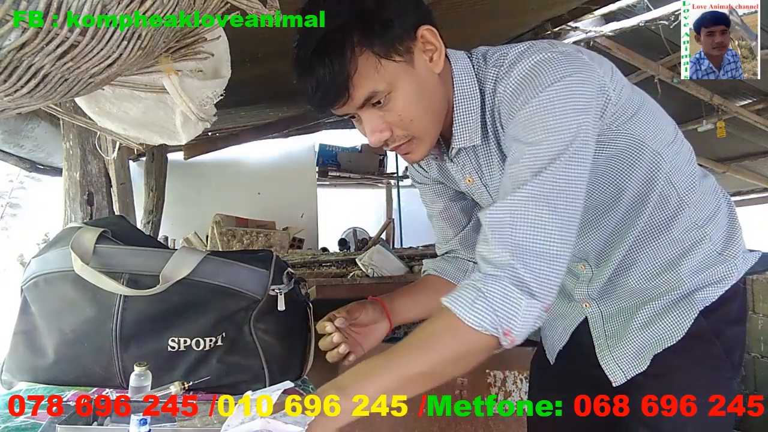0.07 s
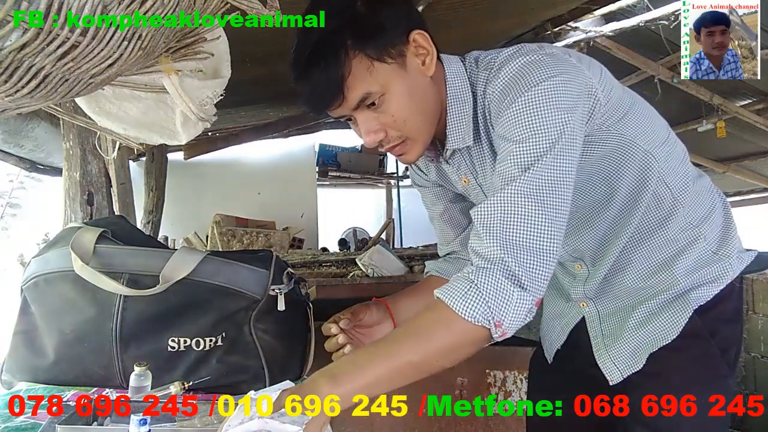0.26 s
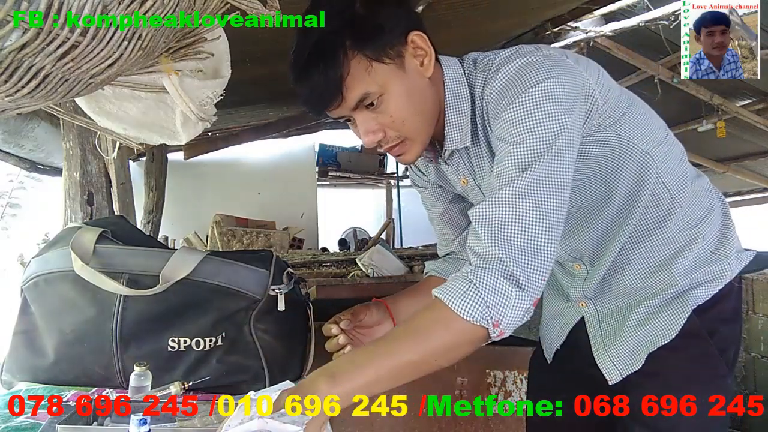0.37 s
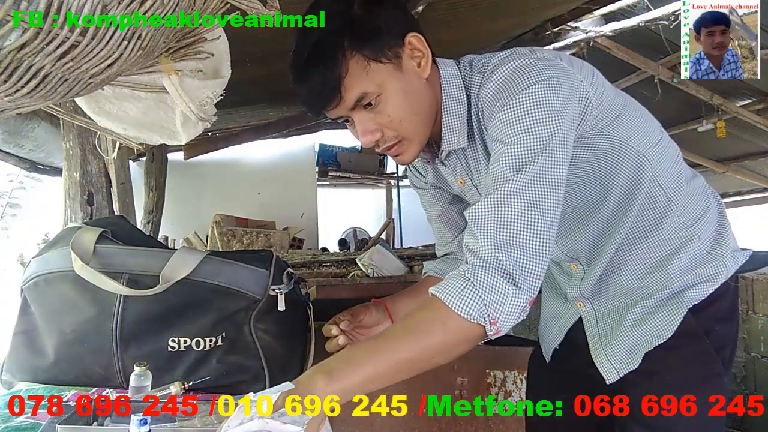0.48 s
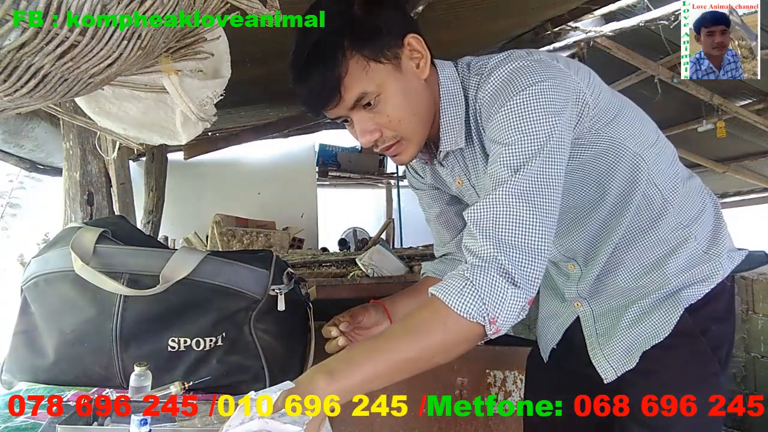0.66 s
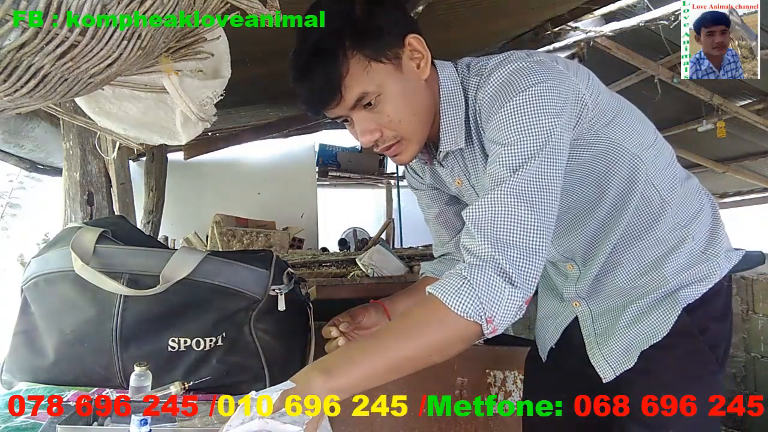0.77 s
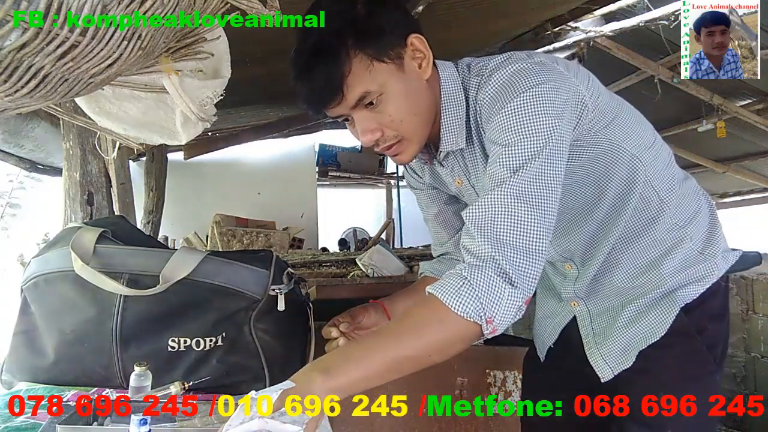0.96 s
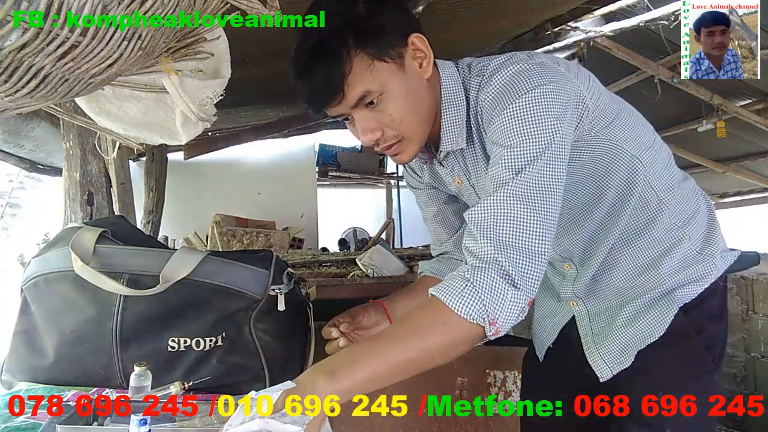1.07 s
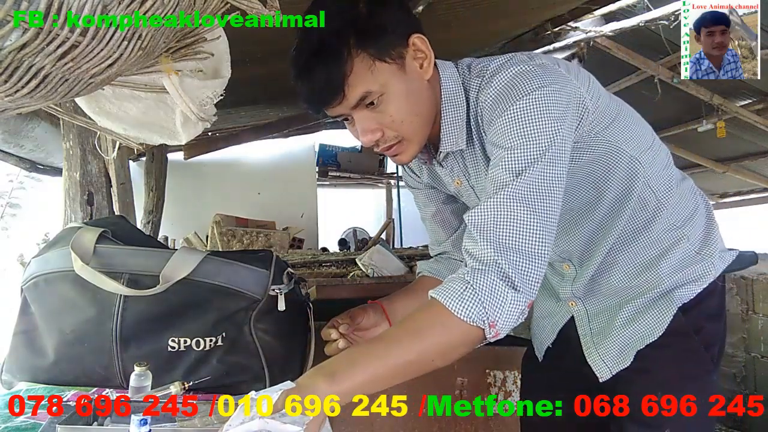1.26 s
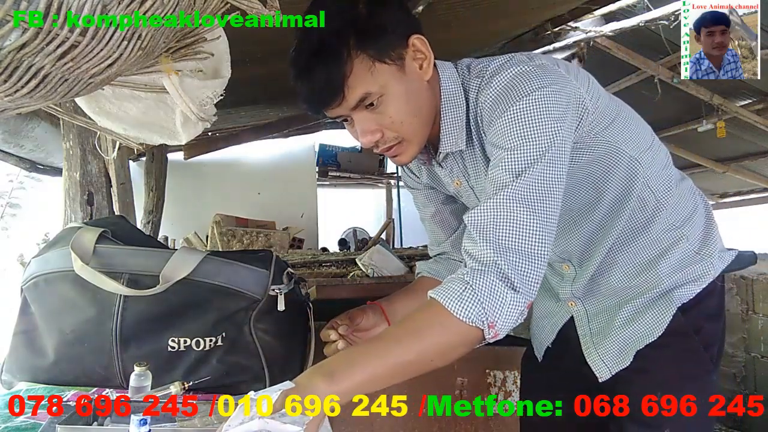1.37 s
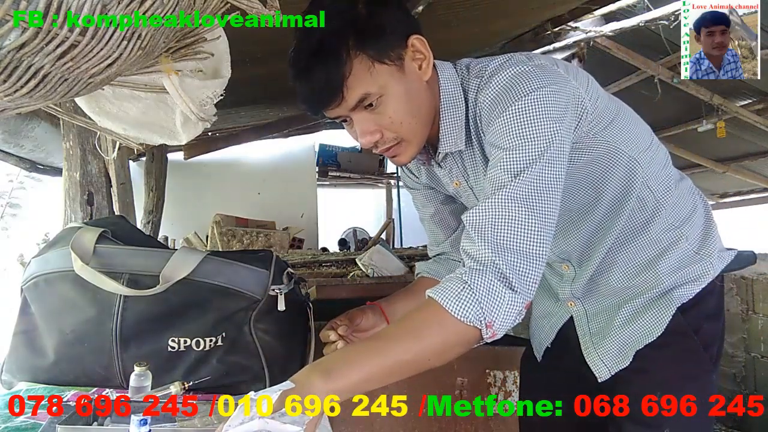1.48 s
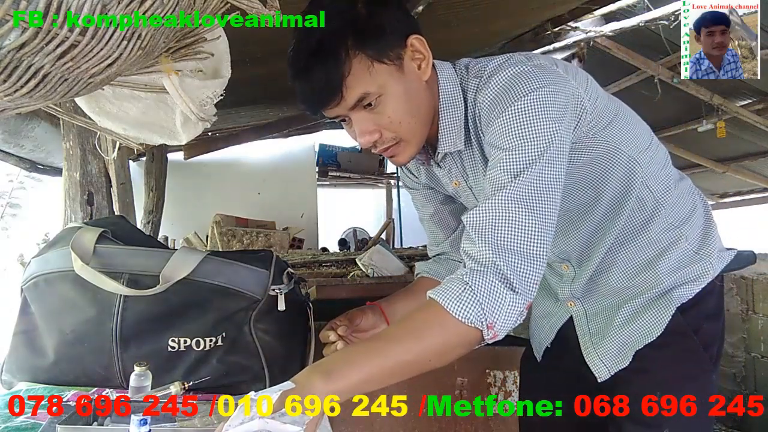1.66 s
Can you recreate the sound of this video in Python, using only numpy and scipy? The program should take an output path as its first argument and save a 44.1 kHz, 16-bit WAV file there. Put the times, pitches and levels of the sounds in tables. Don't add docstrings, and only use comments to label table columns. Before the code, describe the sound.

A pig grunts close by from 0.1 to 0.4 seconds, in separate throaty pulses peaking near 0.25, with a short wall slap. From 0.43 to 1.55 a pig further back gives seven hoarse cries, mostly arching in pitch; the first is highest and loudest, later ones softer, with one last high cry at 1.35. Thin plastic crackles at the microphone, strongest from 0.5 to 0.9. Birds chirp and trill; a distant engine throbs faintly.

```python
import sys
import numpy as np
from scipy import signal
from scipy.fft import rfft, irfft
from scipy.io import wavfile
from scipy.ndimage import uniform_filter1d

SR = 44100
rng = np.random.default_rng(int(sys.argv[2]) if len(sys.argv) > 2 else 0)


def wav_out(sig):
    wavfile.write(sys.argv[1], SR, np.round(np.clip(np.atleast_2d(sig).T, -1, 1) * 32767).astype(np.int16))


def rack_gain(trim_db):
    fader = np.asarray(trim_db, float)
    return 10 ** (fader / 20)


N = 77175


def evened(x):
    return x / np.sqrt(np.mean(x ** 2) + 1e-20)


def read(points, hz):
    f, value = np.transpose(points)
    return np.interp(np.log(hz + 1), np.log(f + 1), value)


def add(mix, s, sound):
    part = mix[max(round(s * SR), 0):][:len(sound)]
    part += sound[:len(part)]


def resonate(x, hz, width):
    turn = np.exp(2j * np.pi * np.cumsum(hz * np.ones(len(x))) / SR)
    r = np.exp(-np.pi * width / SR)
    return 2 * (turn * signal.lfilter([1 - r], [1, -r], x / turn + 1e-18)).real


def drift(n, smooth_s):
    size = max(round(smooth_s * SR), 1)
    smooth = uniform_filter1d(rng.standard_normal(n), size)
    return evened(uniform_filter1d(smooth, size))


def colour(x, points):
    return irfft(rfft(x) * rack_gain(read(points, np.fft.rfftfreq(N, 1 / SR))), N)


def placed(x, side, pan_db):
    port_gap_s = 0.00037
    turn = np.exp(1j * np.pi * np.fft.rfftfreq(N, 1 / SR) * port_gap_s * side)
    ports = np.array([turn * rack_gain(pan_db / 2), rack_gain(-pan_db / 2) / turn])
    return irfft(rfft(x) * ports, N)


def shed(x, first_s):
    # hz, t60_s
    decay = [(150, 0.59), (600, 0.42), (2000, 0.48), (6000, 0.33), (12000, 0.041)]
    taps = np.zeros((2, SR // 2))
    at = np.arange(round(first_s * SR), SR // 2 - 20, 20)
    at = at + rng.integers(0, 20, (2, len(at)))
    np.put_along_axis(taps, at, rng.choice([-1., 1.], at.shape), 1)
    hz, t, z = signal.stft(taps, SR, nperseg=256)
    same = 1 / (1 + (hz[:, None] / 500) ** 2)
    z = np.array([z[0], same * z[0] + np.sqrt(1 - same ** 2) * z[1]])
    fade = rack_gain(-60 * t / read(decay, hz)[:, None])
    tail = signal.istft(z * fade, SR, nperseg=256)[1]
    return signal.fftconvolve(x[None], tail / np.linalg.norm(tail[0]), axes=1)[:, :N]


def farm_gain(column):
    # start_s, noise_db, engine_db
    swell = [
        (0, -4, 2.6),
        (.05, -6.5, 3),
        (.14, -0.5, 4),
        (.2, 5.2, -4.9),
        (1.1, -0.2, 0.3),
        (1.3, 4, -4),
        (1.75, 5, -4),
    ]
    rows = np.transpose(swell)
    return rack_gain(np.interp(np.arange(N) / SR, rows[0], rows[column]))


def engine():
    # multiple, level_db
    orders = [(3, -92), (4, -63), (5, -55.5), (6, -63), (7, -72.5), (8, -83), (10, -69)]
    firing_hz = 18.3
    turns = np.cumsum(firing_hz * (1 + 0.0168 * drift(N, 0.14))) / SR
    out = np.zeros(N)
    for k, db in orders:
        level = 1.21 * rack_gain(db + 2. * drift(N, 0.18))
        out += level * np.cos(2 * np.pi * k * turns + 0.33 * drift(N, 0.034))
    return out


def air():
    # hz, level_db_per_hz
    spectrum = [(15, -64), (25, -19.5), (98, -12.5), (326, -16.5), (1060, -21), (1900, -47), (4240, -34),
                (12000, -77), (14900, -82)]
    left, right = rng.standard_normal((2, N))
    low = signal.lfilter([.04], [1, -.96], left - right)
    ports = np.array([left, right + 1.04 * low])
    return rack_gain(-57 + 0.28 * drift(N, 0.096)) * evened(colour(ports, spectrum))


def rustle():
    # start_s, level_db
    pressure = [(0.0, -73), (0.15, -75.5), (0.19, -62.5), (0.272, -57.5), (0.398, -69.5), (0.476, -48),
                (0.618, -55.5), (0.74, -48), (0.906, -50), (0.994, -60.5), (1.212, -65.5), (1.31, -72),
                (1.364, -60.5), (1.612, -74), (1.646, -64.5), (1.75, -75.5)]
    # hz, level_db_per_hz
    crinkle = [(1900, -8), (3000, -0.5), (3300, 1), (4340, -6), (6440, 1.5), (7570, -11), (8250, -8.5),
               (13200, -20), (14900, -42)]
    t = np.arange(N) / SR
    sizes = rack_gain(np.minimum(rng.exponential(1, (2, N)), 4))
    grains = sizes * (rng.random((2, N)) < .2) * rng.standard_normal((2, N))
    near = evened(colour(grains[0] * rack_gain(2. * drift(N, 0.0035)), crinkle))
    wide = evened(colour(grains * rack_gain(2. * drift(N, 0.032)), crinkle))
    level = rack_gain(4.5 + np.interp(t, *np.transpose(pressure)))
    return level * (0.1 * placed(near, 0.98, 0.87) + 0.76 * wide)


def patchy(x):
    patch_db = 4
    hz, t, z = signal.stft(x, SR, nperseg=512)
    field = uniform_filter1d(rng.standard_normal(z.shape[1:]), size=6, axis=0)
    field = evened(uniform_filter1d(field, size=9, axis=1))
    depth = 0.4178 + hz[:, None] / 12000
    return signal.istft(z * rack_gain(patch_db * field * depth), SR, nperseg=512)[1][:, :N]


def trilling():
    # start_s, length_s, pitch_hz, width_hz, level_db
    trills = [(0, .19, 3150, 240, -68), (.043, .065, 4100, 900, -56), (0, .06, 5900, 600, -68),
              (1.645, .1, 5200, 800, -66), (.045, .06, 8000, 900, -73), (.04, .13, 800, 40, -65),
              (.09, .09, 600, 50, -63), (.165, .03, 5300, 900, -62), (1.34, .075, 8350, 500, -51),
              (1.33, .15, 6250, 500, -60), (1.335, .15, 12200, 900, -70), (1.644, .012, 9500, 5000, -67),
              (1.33, .17, 450, 110, -48), (1.1, .11, 430, 90, -50), (1.1, .1, 1065, 50, -48),
              (1.34, .3, 4450, 400, -66), (1.55, .2, 600, 70, -61), (1.6, .15, 1050, 90, -66),
              (1.05, .07, 8300, 300, -67), (.92, .65, 340, 130, -57)]
    beats_per_s = 110
    out = np.zeros(N)
    for s, length, hz, width, db in trills:
        t = np.arange(0, length, 1 / SR)
        beat = 0.58 + np.sin(np.pi * beats_per_s * t) ** 2
        buzz = resonate(resonate(beat * rng.standard_normal(len(t)), hz, width), hz, width)
        envelope = np.minimum(t / 0.0073, 1) * rack_gain(-7 * t / length)
        add(out, s, rack_gain(db) * envelope * evened(buzz))
    return out


def grunt():
    # start_s, level_db, brightness_db_per_octave, thump_db
    pulses = [
        (.104, -57, -8, -58),
        (.15, -45, -7, -50),
        (.185, -30, .5, -46),
        (.223, -19.5, 0, -42),
        (.26, -18.5, 0, -42),
        (.295, -23.5, -1, -42),
        (.332, -35, -9, -39),
        (.369, -42, -10, -44),
    ]
    # pitch_hz, width_hz, level_db
    throat = [(330, 200, -4), (590, 260, 0), (1087, 300, 1), (1500, 500, -3), (1960, 600, 4),
              (2550, 600, 0), (3200, 600, 1.5), (4100, 1350, 0), (6500, 2500, -17)]
    # pitch_hz, width_hz, level_db
    chest = [(97.6, 26, 3.5), (143.3, 48.4, 3.5), (190, 51, -1.5), (300, 400, -6.5)]
    snap_s, puff_s, puff_db = 0.00083, .0045, -7
    slap_s, slap_db = .0075, -8
    out, t = np.zeros(N), np.arange(4000) / SR
    click = 1. * (t == 0)
    for s, db, bright_db, thump_db in pulses:
        noise = rng.standard_normal(len(t))
        snap = (t / snap_s) ** 2 * np.exp(-t / snap_s) * noise
        snap[round(2 * snap_s * SR)] -= 7.
        puff = (t / puff_s) * np.exp(-t / puff_s) * noise[::-1]
        drive = snap + rack_gain(puff_db) * puff
        pulse, thump = np.zeros(len(t)), np.zeros(len(t))
        for f, w, g in throat:
            ring = resonate(resonate(drive, f, 0.88 * w), f, 0.81 * w)
            pulse += rack_gain(g + bright_db * np.log2(f / 600)) * ring / np.sqrt(w)
        for f, w, g in chest:
            thump += rack_gain(g) * resonate(resonate(click, f, 1.5 * w), f, 1.26 * w) / w
        pulse = signal.lfilter(*signal.butter(1, 8000., fs=SR), pulse)
        pulse = rack_gain(db) * pulse / abs(pulse).max() + 2 * rack_gain(thump_db) * thump / abs(thump).max()
        add(out, s - .001, pulse)
        add(out, s - .001 + slap_s, rack_gain(slap_db) * pulse)
    return out


def chirping():
    # start_s, length_s, from_hz, to_hz, level_db
    chirps = [(0.18, 0.024, 3540, 5010, -49), (.2, 0.011, 5500, 5900, -47),
              (0.215, 0.023, 4040, 3480, -47.5), (0.266, 0.026, 3730, 4200, -47),
              (0.616, 0.024, 3750, 5900, -46.5), (0.69, 0.032, 3590, 4500, -49.5),
              (0.737, 0.012, 5010, 5400, -45.5), (0.743, 0.0069, 6590, 6230, -43.5),
              (0.815, 0.027, 5300, 6300, -41.5), (0.861, 0.019, 5840, 6150, -53),
              (0.89, 0.033, 4440, 6070, -42.5), (1.001, 0.037, 3600, 2490, -61.5),
              (1.175, 0.0224, 4135, 4694, -48), (1.186, 0.042, 4644, 2997, -52.5),
              (1.234, 0.042, 3943, 2250, -51.5), (1.642, 0.012, 3930, 5684, -46.5),
              (1.652, 0.012, 5490, 5600, -54.5), (1.667, .012, 5600, 3820, -63),
              (1.67, 0.0104, 3860, 3110, -52), (1.717, 0.023, 3060, 4620, -51)]
    out = np.zeros(N)
    for s, length, from_hz, to_hz, db in chirps:
        u = np.arange(0, length, 1 / SR) / length
        hz = from_hz + (to_hz - from_hz) * u + 120 * drift(len(u), .0006)
        turns = np.cumsum(hz) / SR
        whistle = np.sin(2 * np.pi * turns) + .07 * np.sin(4 * np.pi * turns)
        add(out, s, 1.316 * rack_gain(db) * np.sin(np.pi * u) ** 0.45 * whistle)
    return out


def cry(points, rough, dull_db):
    # pitch_hz, width_hz, level_db
    mouth = [(430, 133, -7), (575, 237, 1.5), (1048, 396, -1.5), (1654, 446, -5.5), (2250, 750, -19.5),
             (6300, 4000, -32)]
    jitter, flutter_hz, flutter_depth = 0.045, 64., 0.8
    at, pitch, effort = np.transpose(points)
    t = np.arange(at[0], at[-1], 1 / SR)
    hz = uniform_filter1d(np.interp(t, at, pitch), size=400, mode="nearest")
    turns = np.cumsum(hz * (1 + jitter * drift(len(t), 0.002))) / SR
    folds = sum(np.cos(2 * np.pi * k * turns) for k in range(1, 14))
    puffs = (0.078 + np.exp(-(turns % 1) / 0.27)) * rng.standard_normal(len(t))
    flutter_turns = np.cumsum(flutter_hz * (1 + 0.295 * drift(len(t), 0.016))) / SR
    flutter = 1 + flutter_depth * np.cos(2 * np.pi * flutter_turns)
    drive = flutter * ((1 - rough) * evened(folds) + rough * evened(puffs))
    opening = (hz / 620) ** .35
    voice = np.zeros(len(t))
    for k, (f, w, db) in enumerate(mouth):
        ring = resonate(resonate(drive, f * opening, 0.94 * w), f * opening, 1.17 * w)
        treble_db = dull_db * np.clip(np.log2(f / 1150), 0, 1.3)
        voice += (-1) ** k * rack_gain(db + treble_db) * ring
    steady = voice / np.sqrt(uniform_filter1d(voice ** 2, size=2000) + 1e-12)
    return at[0], rack_gain(0.04 + np.interp(t, at, effort)) * steady


def crying():
    # time_s, pitch_hz, effort_db
    cries = [
        [(.43, 494.3, -46.5), (.448, 553.5, -42), (.462, 599.4, -31), (.482, 651.8, -31.5), (.502, 677, -27.5),
         (.53, 688.2, -30), (.57, 681.6, -30), (.586, 682, -40), (.598, 640, -68)],
        [(.62, 480, -50), (.646, 524.6, -37), (.67, 555.5, -29.5), (.69, 613.4, -30), (.725, 584.3, -32.5),
         (.748, 536.8, -49), (.775, 525, -36), (.795, 488, -47)],
        [(.79, 450, -35.5), (.8, 486, -36), (.826, 540, -45.5), (.848, 582.7, -36.5), (.884, 581.3, -44.5),
         (.914, 530.2, -39.5), (.932, 484.6, -36.5), (.95, 458, -51)],
        [(.955, 485, -43), (.975, 494, -45), (1., 474, -57), (1.02, 456, -64)],
        [(1.02, 430, -49), (1.048, 491.3, -40.5), (1.08, 537.6, -39.5), (1.108, 554.6, -39.5),
         (1.134, 542.5, -35.5), (1.17, 531, -45.5), (1.192, 484.3, -49), (1.215, 460, -71)],
        [(1.21, 509, -66), (1.24, 490, -68), (1.275, 467, -52), (1.3, 462, -60.5)],
        [(1.305, 405, -65), (1.345, 500.6, -39), (1.37, 568.8, -39.5), (1.395, 606.6, -34.5), (1.403, 616, -34),
         (1.45, 604.7, -35.5), (1.465, 579.3, -40), (1.53, 608, -82), (1.56, 590, -70)],
    ]
    roughs = [.55, .58, .35, .45, .36, .5, .4]
    dulls = [.5, -3, -10, -10, -9, -14, -11]
    out = np.zeros(N)
    for row in zip(cries, roughs, dulls):
        add(out, *cry(*row))
    return out


def scene():
    cry_wet_db, grunt_wet_db, bird_wet_db = -7, -12, -4.5
    far, near, roof = crying(), grunt(), chirping() + trilling()
    mix = farm_gain(column=2) * engine() + farm_gain(column=1) * air()
    mix = mix + patchy(rustle())
    mix = mix + placed(near, -0.25, 0.) + rack_gain(grunt_wet_db) * shed(near, 0.011)
    mix = mix + placed(roof, 0.819, 6.6) + rack_gain(bird_wet_db) * shed(roof, 0.0034)
    return mix + placed(far, 0.92, 0.35) + rack_gain(cry_wet_db) * shed(far, 0.003912)


def gate(x):
    gate_over_db, gate_depth_db = 6, -11
    hz, t, z = signal.stft(x, SR, nperseg=1024, noverlap=768)
    power = uniform_filter1d((abs(z) ** 2).mean(0), size=7, axis=0)
    power = uniform_filter1d(power, size=5, axis=1)
    level_db = 10 * np.log10(power + 1e-16)
    over_db = level_db - np.quantile(level_db, .12, axis=1)[:, None]
    cut_db = gate_depth_db * np.clip(1 - over_db / gate_over_db, 0, 1) * (hz[:, None] > 200)
    return signal.istft(z * rack_gain(cut_db), SR, nperseg=1024, noverlap=768)[1][:, :N]


def low_pass(x):
    return signal.sosfilt(signal.butter(12, 15040, fs=SR, output="sos"), x)


def record(dry):
    bass_cut = signal.lfilter(*signal.butter(2, 45., "high", fs=SR), dry)
    mix = gate(bass_cut)
    return low_pass(mix)


dry = scene()
out = record(dry)
wav_out(out)
```